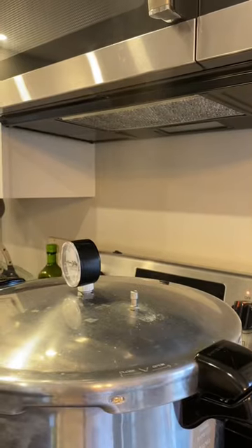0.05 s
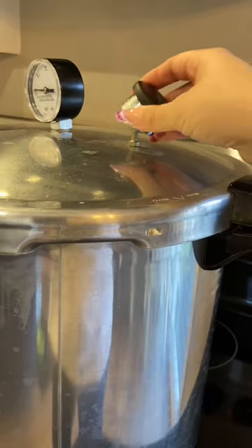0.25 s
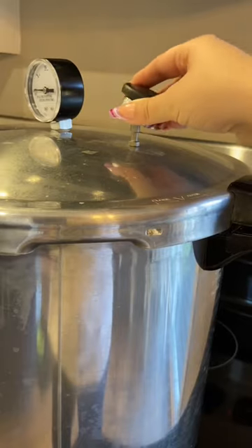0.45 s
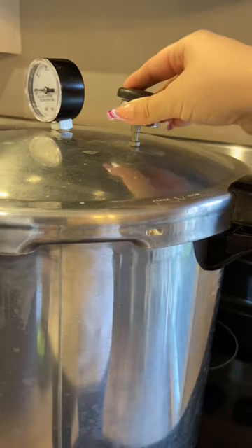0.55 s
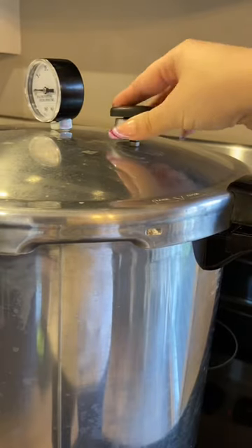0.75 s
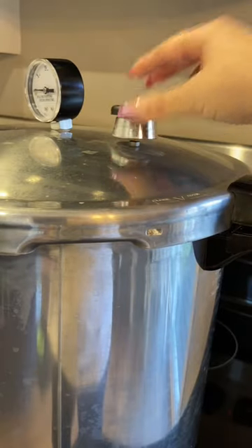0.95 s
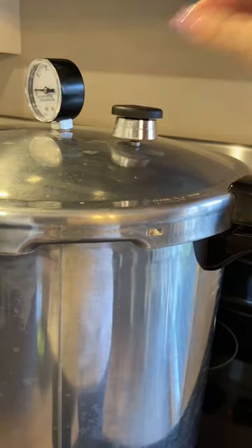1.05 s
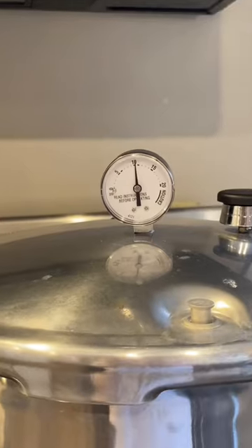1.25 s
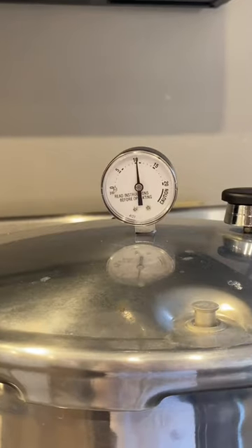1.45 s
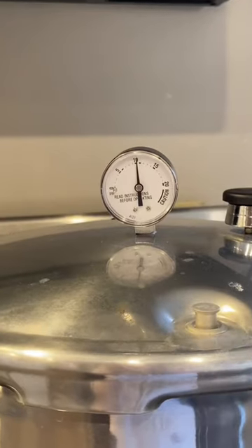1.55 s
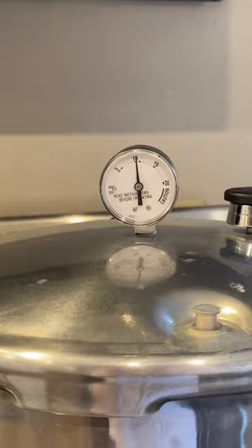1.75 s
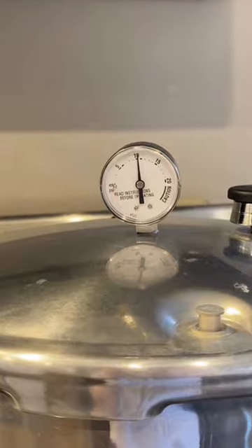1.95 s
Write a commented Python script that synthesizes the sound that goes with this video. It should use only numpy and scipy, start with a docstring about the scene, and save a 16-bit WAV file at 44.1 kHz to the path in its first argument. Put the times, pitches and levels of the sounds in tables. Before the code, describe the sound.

A metal weight clunks onto a pressure canner's steam vent. First the steam rushes against it with a thin whistle, then it knocks, scrapes and seats, ringing the lid. The pot simmers on quietly, close by in a kitchen.

```python
"""A faint hiss and sizzle come first: steam leaves the vent pipe of a pressure canner rumbling on a stove.
A metal weight is held over the pipe; the turbulent jet rushes against it and whistles in its hollow.
The weight knocks on the pipe, slides down and seats with a clunk that rings the modes of the lid.
Then the closed pot seethes and ticks as bubbles collapse in it, with a faint hiss and a growing hum."""
import sys
import numpy as np
from scipy import signal
from scipy.fft import rfft, irfft
from scipy.io import wavfile

SR = 44100
rng = np.random.default_rng(int(sys.argv[2]) if len(sys.argv) > 2 else 0)


def output_pcm(signal):
    """Save a mono or channel-first signal as 16-bit PCM at the path in sys.argv[1].

    Samples are clipped to [-1, 1] before scaling.
    """
    pcm = np.clip(np.atleast_2d(signal).T, -1, 1) * 32767
    wavfile.write(sys.argv[1], SR, np.round(pcm).astype(np.int16))


N = 88200

# spectrum of the metal's reverberant tail and of its scraping: (f/Hz, density level/dB)
METAL_SPECTRUM = [(40, -115), (100, -83), (200, -71), (450, -63), (600, -67.5), (950, -57.5), (1400, -62),
                  (1700, -64.5), (2600, -66), (3300, -70.5), (5200, -72), (8000, -89.5), (16000, -109)]


def from_db(db):
    """Amplitude ratio: tenfold for every 20 dB."""
    return 10 ** (np.asarray(db) / 20)


def rms_one(x):
    """Normalisation to unit mean power."""
    return x / np.sqrt(np.mean(x ** 2) + 1e-20)


def level(points):
    """Amplitude envelope, linear in decibels between (t/s, level/dB) points."""
    return from_db(np.interp(np.arange(N) / SR, *np.transpose(points)))


def at_hz(points, hz):
    """Interpolation on a logarithmic frequency axis."""
    f, value = np.transpose(points)
    return np.interp(np.log(hz + 0.0011), np.log(f), value)


def flutter(rate_hz, depth_db):
    """Random amplitude modulation: low-passed noise moves the level by depth_db rms."""
    pole = np.exp(-2 * np.pi * rate_hz / SR)
    drift = signal.lfilter([1], [1, -2 * pole, pole * pole], rng.standard_normal(2 * N))[N:]
    return from_db(depth_db * rms_one(drift))


def noise(spectrum=None, diffuse=1):
    """Partly coherent stereo noise, white or shaped; coherence is lower in the treble and when diffuse."""
    # left-right coherence of the diffuse field: (f/Hz, coherence)
    coherence = [(60, .9995), (300, .99), (700, 0.88), (1400, .96), (2800, 0.86), (5000, 0.94), (9500, 0.9),
                 (14000, 0.9)]
    hz = np.arange(N // 2 + 1) * SR / N
    alike = np.clip(at_hz(coherence, hz), 0, 1) ** diffuse
    mid, side = rfft(rng.standard_normal((2, N)))
    both = np.sqrt((1 + alike) / 2) * mid + np.sqrt((1 - alike) / 2) * side * [[1], [-1]]
    return irfft(both if spectrum is None else both * from_db(at_hz(spectrum, hz)) * np.sqrt(SR / 2), N)


def resonance(x, hz, width_hz):
    """Forced resonance: two stages in cascade, each width_hz wide, give steep skirts; unit rms."""
    b, a = signal.iirpeak(hz, hz / width_hz, fs=SR)
    return rms_one(signal.lfilter(b, a, signal.lfilter(b, a, x)))


def ring(clicks, hz, t60):
    """Damped oscillator: a unit impulse starts a decaying sine of amplitude 1."""
    r, w = from_db(-60 / (t60 * SR)), 2 * np.pi * hz / SR
    return signal.lfilter([0, np.sin(w)], [1, -2 * r * np.cos(w), r * r], clicks + 1e-18)


def burst(start, rise_s, t60):
    """Transient envelope: a quick rise, then exponential decay by 60 dB in t60 seconds."""
    age = np.maximum(np.arange(N) / SR - start, 0)
    return (1 - np.exp(-age / rise_s)) * np.exp(-np.log(1000) * age / t60)


def kitchen(x, wet_db=-8):
    """Early reflections: lid, hood and walls add a short, dense response; power is conserved."""
    response = noise() * burst(start=0.0012, rise_s=0.0005, t60=0.091)
    response = response / np.sqrt(np.sum(response ** 2) / 2)
    reflections = signal.fftconvolve(x, response, axes=1)[:, :N]
    wet = from_db(wet_db)
    return (x + wet * reflections) / np.sqrt(1 + wet ** 2)


def vent_hiss():
    """Turbulent flow noise: steam hisses faintly at the vent, and the pipe sizzles until covered."""
    # envelopes of the leak and the open pipe: (t/s, level/dB)
    leak_levels = [(0.0, 2), (0.17, 1.5), (0.8, -3), (0.94, 0), (1.12, -5), (1.16, -9), (1.335, -12.5),
                   (1.355, 1), (1.42, 2), (1.59, 0.5), (1.63, -14), (1.68, -14.5), (1.73, -1), (1.84, -9),
                   (2.0, -7.5)]
    sizzle_levels = [(0.18, -3), (0.24, -35), (0.3, -100)]
    # their spectra: (f/Hz, density level/dB)
    leak_spectrum = [(200, -100), (1000, -90), (2300, -83), (3200, -86.5), (4800, -81), (6000, -89.5),
                     (8800, -89), (12000, -93.5), (16000, -100)]
    sizzle_spectrum = [(1000, -120), (5200, -94), (7000, -83.5), (9000, -88), (12000, -93), (16000, -92)]
    leak = noise(leak_spectrum) * level(leak_levels) * flutter(rate_hz=28, depth_db=1.07)
    sizzle = noise(sizzle_spectrum) * level(sizzle_levels)
    return kitchen(leak) + sizzle


def simmer(bubbles_per_s=63, bubble_db=-59, spread_db=4.0, ring_cycles=14):
    """Bubbles collapse as a Poisson process, each a damped oscillation, over the pot's rumble."""
    # spectrum of the rumble: (f/Hz, density level/dB)
    rumble_spectrum = [(22, -104), (38, -83), (56, -62), (80, -71.5), (115, -68), (190, -73), (270, -76.5),
                       (340, -73), (600, -81.5), (950, -80), (1400, -88.5), (2300, -89), (5000, -100),
                       (16000, -120)]
    pitches_hz = np.geomspace(800, 4200, 14)
    sizes = from_db(spread_db * np.minimum(rng.exponential(1, N), 2)) * rng.choice([-1, 1], N)
    collapses = sizes * (rng.random(N) < bubbles_per_s / SR)
    pitch_index = rng.integers(0, len(pitches_hz), N)
    pops = np.zeros((2, N))
    for k, hz in enumerate(pitches_hz):
        ear_gains = from_db(rng.normal(0, 1, (2, 1)))
        pops += ring(collapses * (pitch_index == k), hz, ring_cycles / hz) * ear_gains
    rumble = noise(rumble_spectrum) * flutter(rate_hz=18, depth_db=2.0)
    return rumble + from_db(bubble_db) * rms_one(pops)


def ticks(band_ratio=1.58, room_db=-24):
    """Boiling bubbles pop in the pot: broad, heavily damped resonances, each with a brief reverberation."""
    # ticks of the pot: (t/s, level/dB, f/Hz, T60/s)
    pot_ticks = [(0.012, -33, 2940, 0.026), (0.883, -36.5, 2320, 0.13), (0.937, -36.5, 4200, 0.053),
                 (0.993, -33, 1410, 0.045), (0.998, -33.5, 2090, 0.033), (1.048, -38.5, 1430, 0.047),
                 (1.088, -40.5, 1950, 0.13), (1.166, -43.5, 2000, 0.031), (1.259, -37.5, 1140, 0.043),
                 (1.303, -41.5, 2040, 0.022), (1.333, -37.5, 1750, 0.035), (1.403, -34, 3700, 0.045),
                 (1.455, -32.5, 2360, 0.017), (1.515, -38, 2390, 0.014), (1.533, -33.5, 1850, 0.025),
                 (1.683, -41.5, 4000, 0.044), (1.702, -34.5, 1930, 0.023), (1.787, -42, 4500, 0.017),
                 (1.872, -37, 2810, 0.027), (1.905, -35, 1220, 0.054), (1.9274, -15, 2440, 0.0052)]
    out, white = np.zeros((2, N)), noise()
    for start, db, hz, t60 in pot_ticks:
        direct = burst(start, rise_s=0.00024, t60=t60)
        room = from_db(room_db) * burst(start, rise_s=0.0014, t60=0.11)
        tick = from_db(db) * (direct + room) * resonance(white, hz, width_hz=0.54 * hz)
        band = signal.butter(2, [hz / band_ratio, hz * band_ratio], "band", fs=SR, output="sos")
        out += signal.sosfilt(band, tick + 1e-18)
    return out


def steam_jet():
    """An impinging jet rushes on the weight and drives the cavity resonances of its hollow."""
    # envelopes of the rush and the whistle: (t/s, level/dB)
    rush_levels = [(0.12, -77), (0.17, -24), (0.2, 0.5), (0.24, 1.5), (0.29, 2), (0.41, -1), (0.55, 0),
                   (0.582, -14), (0.66, -10.5), (0.71, -4), (0.76, -78)]
    whistle_levels = [(0.18, -74), (0.212, -29.5), (0.235, -19), (0.28, -19), (0.305, -25.5), (0.37, -25),
                      (0.42, -28.5), (0.515, -22.5), (0.575, -32), (0.65, -29.5), (0.71, -32), (0.78, -120)]
    # spectrum of the rush: (f/Hz, density level/dB)
    rush_spectrum = [(30, -120), (100, -94), (400, -70.5), (1000, -72.5), (2300, -65), (3200, -72),
                     (4200, -62.5), (5900, -61.5), (7300, -83), (8800, -65.5), (12000, -71.5), (16000, -74)]
    # resonances of the hollow: (f/Hz, half-width of one stage/Hz, relative level/dB)
    cavity_modes = [(4554, 41, -5), (4740, 51, -8), (4950, 77, 0.5), (5083, 57, -5), (5360, 45, -13),
                    (5320, 110, -4), (5553, 53, -5), (3920, 650, -6.5)]
    rush = noise(rush_spectrum) * level(rush_levels) * flutter(rate_hz=30, depth_db=1.07)
    cavity = sum(from_db(db) * resonance(noise(), hz, 2 * half) for hz, half, db in cavity_modes)
    sputter = flutter(rate_hz=320, depth_db=2.2)
    whistle = rms_one(cavity) * level(whistle_levels) * sputter
    return kitchen(rush) + whistle


def struck(modes, times, strength_db, scatter_db):
    """Modal superposition: blows ring each mode, its level varying from blow to blow and ear to ear."""
    out = np.zeros((2, N))
    for k, (hz, db, t60) in enumerate(modes):
        blow_db = strength_db + db + scatter_db * rng.standard_normal(len(times))
        clicks = np.zeros(N)
        clicks[(times * SR).astype(int)] = from_db(blow_db)
        ear_gains = from_db(2.5 * rng.uniform(-1.34, 1, (2, 1)))
        out += (-1) ** k * ring(clicks, hz, t60) * ear_gains
    return out


def weight_knocks(radiation_cutoff_hz=168):
    """Impact excitation: each touch cracks, rings weight and lid, and reverberates in pot and kitchen."""
    # contacts with the pipe: (t/s, weight level/dB, crack level/dB, lid level/dB)
    knocks = [(0.2943, 1, -14, -7), (0.2995, -5, -22, -19), (0.3412, -16.5, -40, -27),
              (0.604, -9, -31, -11), (0.6104, -18, -22, -20), (0.6212, -12.5, -22, -8.5),
              (0.6663, -3, 4.5, -2.5), (0.6700, -0.5, 1, 2), (0.6777, -30, -5, -6.5),
              (0.7032, -27, -9.5, -19), (0.706, -12, -12, -25)]
    # modes of the weight on the pipe and of the lid: (f/Hz, level/dB, T60/s)
    weight_modes = [(480, -31.5, 0.02), (732, -28.5, 0.041), (980, -21.5, 0.022), (1070, -15.5, 0.027),
                    (1408, -9.5, 0.04), (1525, -25, 0.034), (1766, -20.5, 0.027), (2360, -17, 0.028),
                    (2906, -21.5, 0.021)]
    lid_modes = [(253, -42.5, 0.42), (344.3, -33, 0.19), (486, -34.5, 0.39), (695, -22, 0.089),
                 (795, -45.5, 1), (887, -32, 0.39), (965, -32.5, 0.58), (1056, -33.5, 0.36),
                 (1200, -47, 0.35), (1378, -34, 0.41), (1412, -37.5, 0.23), (1615, -54, 0.35),
                 (1930, -45, 0.52), (2640, -37.5, 0.25), (2850, -38, 0.27)]
    # spectrum of the crack: (f/Hz, density level/dB)
    crack_spectrum = [(30, -110), (90, -72), (190, -47.5), (600, -50.5), (1200, -39.5), (2800, -46.5),
                      (3300, -53.5), (5600, -50), (7300, -55.5), (9500, -63), (16000, -73)]
    times, weight_db, crack_db, lid_db = np.transpose(knocks)
    # incoherent bursts add in power
    crack_power, tail_power = np.zeros((2, N))
    for start, crack_gain, tail_gain in zip(times, from_db(crack_db), from_db(lid_db)):
        crack_power += (crack_gain * burst(start, rise_s=0.00045, t60=0.029)) ** 2
        tail_power += (tail_gain * burst(start, rise_s=0.0015, t60=0.74)) ** 2
    weight = struck(weight_modes, times, weight_db, scatter_db=0.5)
    lid = struck(lid_modes, times, lid_db, scatter_db=3.0)
    radiation = signal.butter(2, radiation_cutoff_hz, "high", fs=SR, output="sos")
    crack = np.sqrt(crack_power) * noise(crack_spectrum)
    tail = np.sqrt(tail_power) * noise(METAL_SPECTRUM, diffuse=9.0)
    return signal.sosfilt(radiation, weight + lid) + crack + tail


def weight_slide():
    """Sliding friction: metal rubs roughly on metal as the weight goes down the pipe."""
    # envelope of the scrape: (t/s, level/dB)
    scrape_levels = [(0.53, -68), (0.575, -13), (0.608, 2), (0.635, -2.5), (0.66, -3), (0.68, -73)]
    return noise(METAL_SPECTRUM) * level(scrape_levels) * flutter(rate_hz=140, depth_db=2.5)


def seething():
    """The closed pot's simmer swells as low noise; a narrow, noise-driven resonance grows into a hum."""
    # envelopes of the swell and the hum: (t/s, level/dB)
    swell_levels = [(1.13, -20), (1.18, -3.5), (1.38, 4.5), (1.5, -4), (1.7, -4), (2.0, -6)]
    hum_levels = [(1.1, -66), (1.2, -54), (1.55, -53.5), (1.72, -49)]
    # spectrum of the swell: (f/Hz, density level/dB)
    swell_spectrum = [(40, -110), (105, -69.5), (170, -66.5), (230, -75), (345, -71.5), (470, -72),
                      (620, -90), (1500, -110), (8000, -140)]
    hum = level(hum_levels) * resonance(noise(), hz=319.6, width_hz=9.7)
    return level(swell_levels) * noise(swell_spectrum) + hum


def from_vent(x):
    """Level difference between channels: the upper mids place the vent a little to the right."""
    # balance of the vent: (f/Hz, left minus right level/dB)
    balance = [(2000, -0.2), (2850, -3), (3500, -1.5), (4550, -3.5), (5400, 1.5), (7000, -0.4)]
    hz = np.arange(N + 1) * SR / (2 * N)
    channel_gains = from_db(at_hz(balance, hz) * [[.5], [-.5]])
    return irfft(rfft(x, 2 * N) * channel_gains)[:, :N]


def stereo_pair(x):
    """Phase difference between microphones: the right lags the left, mostly in the treble."""
    # lag of the right channel: (f/Hz, phase/rad)
    phase_lag = [(1900, 0), (2700, 0.63), (4200, 0.75), (5150, 0.7), (7200, 1), (10000, 7.5), (11200, 6),
                 (12900, 10), (14100, 3.5), (15600, 12.5)]
    hz = np.arange(N + 1) * SR / (2 * N)
    lag = np.interp(hz, *np.transpose(phase_lag))
    right = irfft(rfft(x[1], 2 * N) * np.exp(-1j * lag))[:N]
    return np.array([x[0], right])


def scene():
    """Linear superposition of steam, pot and weight."""
    pot = vent_hiss() + simmer() + ticks()
    closing = from_vent(steam_jet() + weight_knocks() + weight_slide())
    return pot + closing + seething()


def record(dry, cutoff_hz=16000):
    """Stereo pickup: the level dips briefly, soft saturation rounds peaks and a low-pass cuts the top."""
    # brief dip in level: (t/s, level/dB)
    dip = [(1.134, -1.5), (1.137, -17), (1.141, -22), (1.146, -15), (1.152, -2.5)]
    rounded = np.tanh(stereo_pair(dry) * level(dip))
    low_pass = signal.ellip(12, .1, 80, cutoff_hz, fs=SR, output="sos")
    return signal.sosfilt(low_pass, rounded)


dry = scene()
out = record(dry)
output_pcm(out)
```